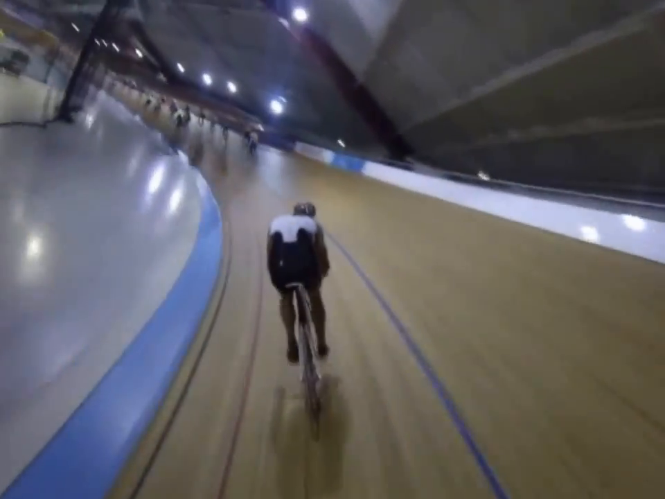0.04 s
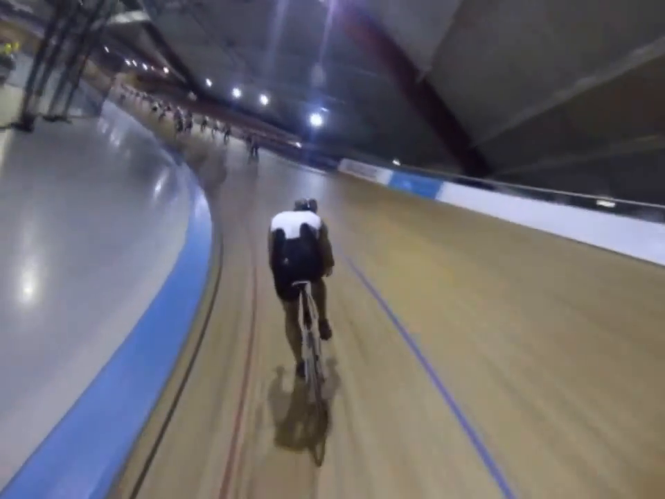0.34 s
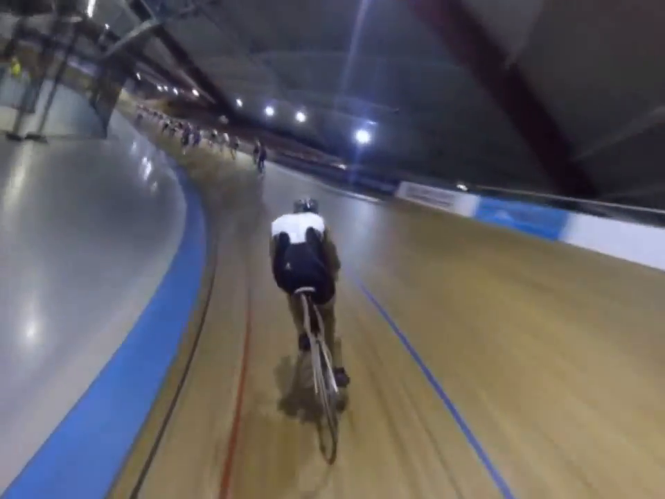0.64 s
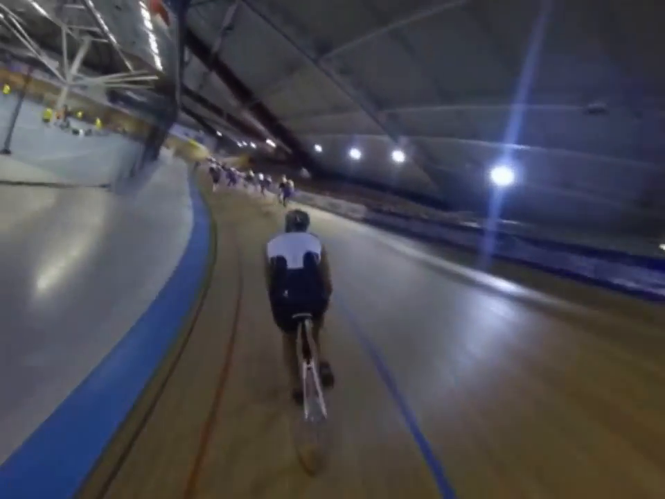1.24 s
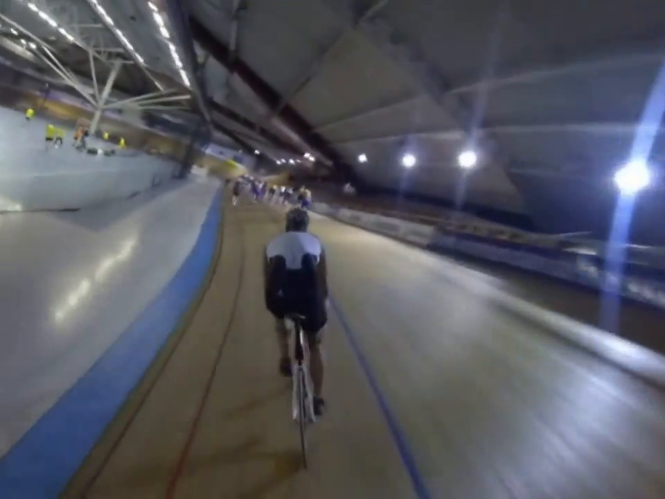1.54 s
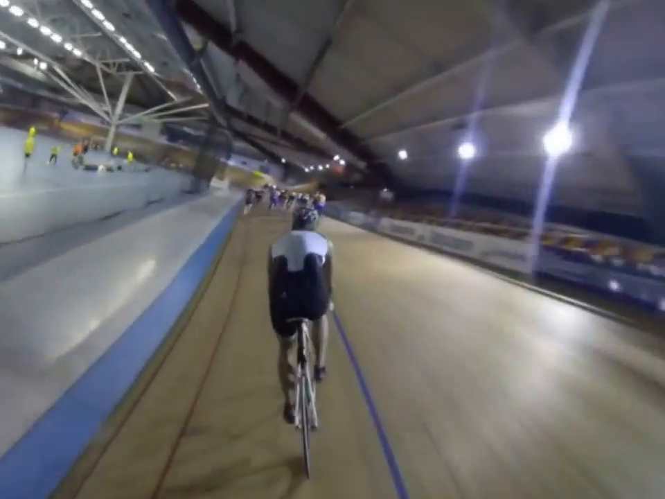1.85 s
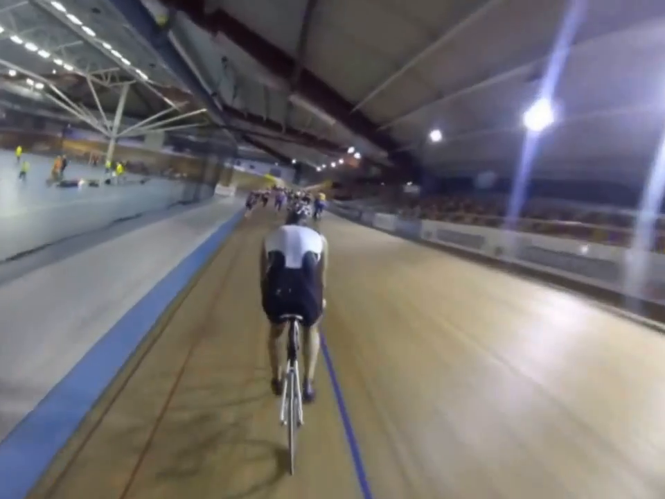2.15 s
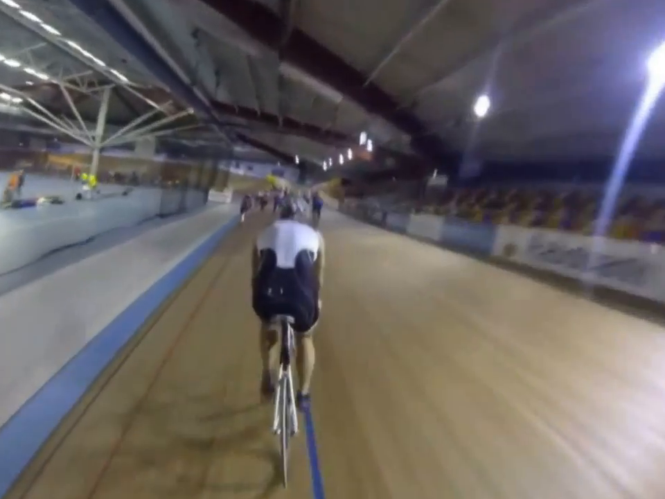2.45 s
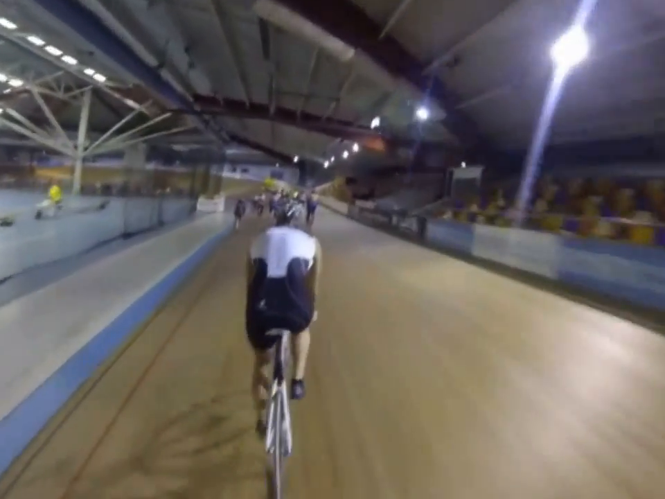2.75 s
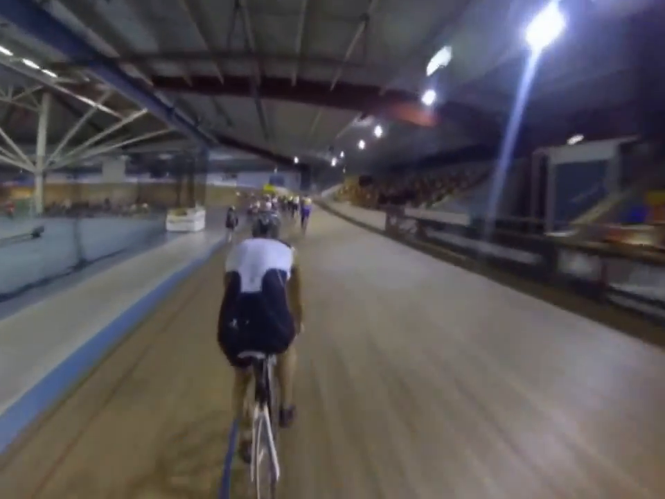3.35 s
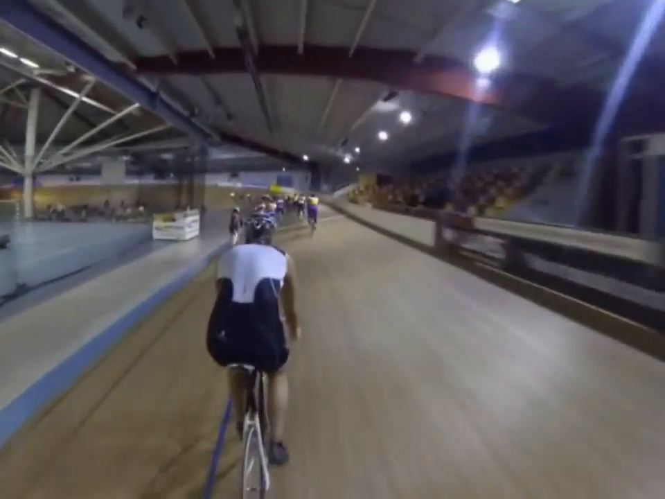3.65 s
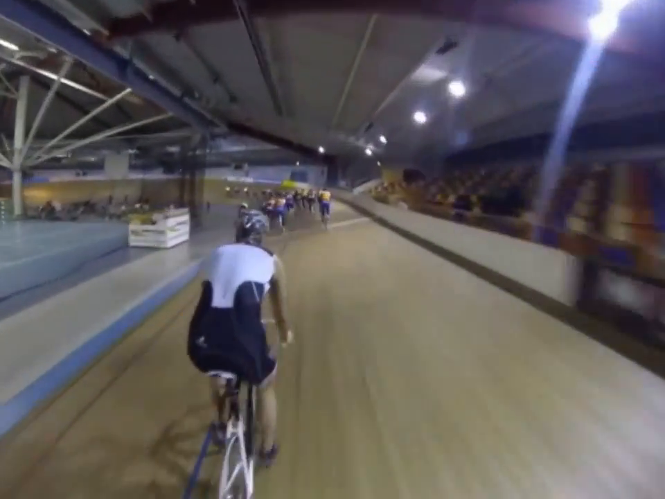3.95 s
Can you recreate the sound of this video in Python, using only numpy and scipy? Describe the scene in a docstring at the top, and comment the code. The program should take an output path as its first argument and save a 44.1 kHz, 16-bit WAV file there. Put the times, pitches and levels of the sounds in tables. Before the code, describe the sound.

Wind rumbles and rushes over a microphone riding on a bicycle, mixed with tyres roaring on an indoor wooden track. Gusts make the roar duck and swell, and the mount rattles briefly near the end.

```python
"""Riding round a velodrome

A camera rides on a track bicycle, close behind another rider, round an indoor wooden track.
Air rumbles and rushes over its housing, the tyres roar on the boards and the mount ticks and rattles.
Buffets of wind push the camera's limiter down, so the whole roar ducks and swells back."""
import sys
import numpy as np
from scipy import signal
from scipy.fft import rfft, irfft
from scipy.io import wavfile
from scipy.ndimage import uniform_filter1d

SR = 44100
rng = np.random.default_rng(int(sys.argv[2]) if len(sys.argv) > 2 else 0)


def bounce(signal):
    """Save signal as a 16-bit WAV file at the path given by the first command-line argument."""
    frames = np.transpose(np.atleast_2d(signal))
    limited = np.clip(frames, -1, 1)
    pcm = np.round(limited * 32767).astype(np.int16)
    wavfile.write(sys.argv[1], SR, pcm)


N = 176400
T = np.arange(N) / SR


def from_db(db):
    """Turn decibels into a number to multiply by."""
    return 10 ** (np.asarray(db) / 20)


def curve(rows):
    """Join (time, level) points with straight lines."""
    return np.interp(T, *np.transpose(rows))


def drift(hz):
    """A random wobble of about size 1, mostly slower than hz."""
    f = np.fft.rfftfreq(N, 1 / SR)
    slow = irfft(rfft(rng.standard_normal(N)) / (1 + (f / hz) ** 2), N)
    return slow / slow.std()


def noise(spectrum, resonances=()):
    """Noise with the spectrum's level in each 1 Hz band, boosted at the resonances."""
    f = np.fft.rfftfreq(N, 1 / SR) + 1e-3
    hz, db = np.transpose(spectrum)
    level = np.interp(np.log(f), np.log(hz), db)
    for centre, width, lift in resonances:
        level = level + lift / (1 + (2 * (f - centre) / width) ** 2)
    return irfft(rfft(rng.standard_normal(N)) * from_db(level), N) * np.sqrt(SR / 2)


def swells(rows):
    """One smooth rise and fall in volume for each row."""
    return sum(from_db(db) / (1 + ((T - s) / half) ** 4) for s, half, db in rows)


def ring(clicks, hz, t60):
    """Each click starts a tone that fades by 60 dB in t60 seconds."""
    decay = from_db(-60 / (t60 * SR))
    step = 2 * np.pi * hz / SR
    return signal.lfilter([0, np.sin(step)], [1, -2 * decay * np.cos(step), decay * decay], clicks + 1e-18)


# eddies (swirls of air) at the microphone opening: f/Hz, level/dB
RUMBLE_SPECTRUM = [(5, -38), (12, -40.5), (22, -35), (33, -29.5), (46, -35), (62, -36.5), (100, -42),
                   (200, -47.5), (400, -63), (1000, -93), (4000, -130)]
# how strong the eddies are: t/s, level/dB
EDDY_STRENGTH = [(0, 0.5), (.25, -0.5), (.42, -1), (.95, -0.5), (1.15, 0.5), (1.65, 0), (1.85, 0),
                 (2.3, 0.5), (2.8, 0), (3.3, -0.5), (3.65, 0), (3.76, -3), (4, -0.5)]
# sudden shoves of wind: t/s, level/dB
WIND_BUFFETS = [(0.33, 1.5), (0.461, -4.5), (0.559, -4), (0.612, -4), (0.806, 0), (0.922, -1.5),
                (1.071, -2), (1.194, -2.5), (1.393, -2.5), (1.549, -3.5), (1.679, -1.5), (1.728, -5.5),
                (1.851, -2), (2.013, -1), (2.111, -2), (2.213, -2.5), (2.375, -2), (2.582, -2.5),
                (2.620, -2), (2.790, -5), (2.903, -4), (3.014, -4), (3.311, -1.5), (3.564, -1.5),
                (3.675, 0.5), (3.703, 1.5), (3.849, 1)]
def rumble(even_over_s=0.0604, evenness=0.53, push_s=0.0042, sweep_s=0.0024):
    """Eddies beat evenly on the microphone; each buffet sweeps them aside with one push or suck of air."""
    eddies = noise(RUMBLE_SPECTRUM)
    power = uniform_filter1d(eddies ** 2, int(even_over_s * SR))
    eddies *= (power.mean() / power) ** (evenness / 2)   # partly level out loud and quiet spots
    eddies *= from_db(curve(EDDY_STRENGTH))
    pushes = np.zeros(N)
    for (s, db), sign in zip(WIND_BUFFETS, rng.choice([-1, 1], len(WIND_BUFFETS))):
        pushes += sign * from_db(db) / (1 + (2 * (T - s) / push_s) ** 2)
        eddies *= 1 - 1 / (1 + ((T - s) / sweep_s) ** 2)
    return eddies + pushes


# how hard the air blows: t/s, level/dB
AIR_STRENGTH = [(0, 0.5), (.2, -2), (.32, -0.5), (.42, 0.5), (.52, 1), (.69, -3.5), (.79, 2), (.95, -0.5),
                (1.03, 1.5), (1.25, -1), (1.55, 0), (1.72, -1.5), (1.95, -0.5), (2.15, -1.5), (2.35, 0.5),
                (2.57, 1), (2.7, -2.1), (3.1, -1.5), (3.28, -1.7), (3.42, -3), (3.6, -1.5), (3.72, -6),
                (3.84, -5.5), (3.92, 1.5), (4, 0.5)]
def airflow():
    """The strength of the passing air in dB, shaken by turbulence."""
    return curve(AIR_STRENGTH) + 0.5 * drift(hz=31)


# tyres rolling on wood: f/Hz, level/dB
TYRE_SPECTRUM = [(60, -68), (210, -50), (400, -51.5), (470, -54), (650, -55.5), (900, -59), (1120, -64),
                 (1320, -78.5), (2000, -79), (5000, -130)]
def tyres(flow_db, follow=0.85, grain_db=0.7):
    """Tyres roar on the boards, roughened by the joints; the level follows the airflow."""
    return noise(TYRE_SPECTRUM) * from_db(follow * flow_db + grain_db * drift(hz=90))


# air rushing past the housing: f/Hz, level/dB
RUSH_SPECTRUM = [(200, -85), (1200, -71), (2100, -71), (2650, -75.5), (3450, -78), (4200, -89), (5500, -94),
                 (6300, -97), (7100, -110), (10000, -125)]
# pitches the housing boosts: f/Hz, width/Hz, boost/dB
HOUSING_RESONANCES = [(1760, 496, 7.5), (5050, 660, 8), (8620, 850, 8)]
# fine hiss at the microphone opening: f/Hz, level/dB
HISS_SPECTRUM = [(3000, -115), (6000, -104), (7300, -104), (9400, -103.5), (10500, -102.5), (12500, -112),
                 (15000, -123)]
# how strong that hiss is: t/s, level/dB
HISS_STRENGTH = [(0, 0), (1.5, -0.5), (2.3, -1), (2.6, -2.5), (3.3, -1), (4, 0)]
def rush(flow_db, hiss_follow=0.72, flutter_db=0.42):
    """Rushing air and fine hiss flutter together, both coloured by the housing."""
    air = noise(RUSH_SPECTRUM, HOUSING_RESONANCES) * from_db(flow_db)
    hiss_db = curve(HISS_STRENGTH) + hiss_follow * flow_db
    hiss = noise(HISS_SPECTRUM, HOUSING_RESONANCES) * from_db(hiss_db)
    return (air + hiss) * from_db(flutter_db * drift(hz=120))


# the track's drone: f/Hz, level/dB
DRONE_SPECTRUM = [(150, -75), (400, -65), (560, -69.5), (1080, -69), (1300, -80.5), (2500, -105),
                  (7000, -160)]
# the pitch the boards boost: f/Hz, width/Hz, boost/dB
BOARD_RESONANCE = [(430, 60, 5)]
def track_drone():
    """The wooden track drones steadily, heard when the wind drops."""
    return noise(DRONE_SPECTRUM, BOARD_RESONANCE)


# surges of low roar: t/s, half length/s, level/dB
SURGE_TIMES = [(.26, 0.13, -10.5), (.78, 0.01, -2.5), (1.175, 0.032, -4), (1.29, 0.047, -5),
               (1.39, 0.033, 0.5), (1.59, 0.062, 2), (1.81, 0.036, -3), (2.36, 0.012, -4),
               (2.59, 0.062, -0.5), (3.28, 0.038, -4.5)]
# their tone: f/Hz, level/dB
SURGE_SPECTRUM = [(30, -69), (90, -45), (140, -43.5), (240, -46), (450, -55), (950, -63.5), (1400, -80),
                  (3000, -110)]
def surges():
    """A low roar swells as eddies roll over the camera."""
    return swells(SURGE_TIMES) * noise(SURGE_SPECTRUM)


# flares of hiss, and brief hisses that go with the mount's ticks at 2.011 and 2.372 s: t/s, half length/s,
# level/dB
FLARE_TIMES = [(0.329, .004, 0), (.803, .005, -8), (2.011, .003, -3), (2.372, .003, 0), (3.403, 0.026, -6),
               (3.47, 0.016, -5), (3.66, 0.02, -4)]
# their tone: f/Hz, level/dB
FLARE_SPECTRUM = [(1500, -100), (3500, -81), (5500, -84.5), (7000, -93.5), (11000, -107), (15000, -114)]
def flares():
    """Air tears off the housing in short, bright hisses; at 2.01 and 2.37 s a brief hiss goes with a tick of
    the mount."""
    return swells(FLARE_TIMES) * noise(FLARE_SPECTRUM)


# quick gusts: t/s, half length/s, level/dB
GUST_TIMES = [(.79, 0.017, -1), (1.005, 0.024, -4), (1.172, 0.017, -0.5), (1.375, 0.019, 0),
              (1.54, 0.018, 2), (1.63, 0.051, -10), (1.82, 0.014, -9), (3.285, 0.016, -4)]
# their tone: f/Hz, level/dB
GUST_SPECTRUM = [(200, -85), (520, -60), (950, -58), (1300, -73.5), (2000, -74), (3400, -82), (4400, -93.5),
                 (7000, -106), (11000, -107), (15000, -124)]
def gusts():
    """Gusts flap past the housing, full in the middle pitches with a puff of hiss on top."""
    return swells(GUST_TIMES) * noise(GUST_SPECTRUM, HOUSING_RESONANCES)


# knocks on the camera mount: t/s, level/dB, favoured f/Hz
MOUNT_KNOCKS = [(2.011, -34, 7000), (2.372, -26, 8500), (3.4433, -17.5, 3900), (3.4455, -31, 5000),
                (3.4578, -21, 6200), (3.4647, -22.5, 1800), (3.4735, -33, 6500), (3.486, -30, 9000),
                (3.4992, -22.5, 2680)]
# tones the mount rings with: f/Hz, level/dB, time to fade 60 dB/s
MOUNT_TONES = [(1760, -3, 0.038), (2980, -8.5, 0.017), (3550, -6, 0.0067), (3980, -6.5, 0.0041),
               (5090, -14, 0.017), (5950, -20, .01), (8600, -18, .01)]
def mount(off_pitch_db=9, off_pitch_octaves=0.63, contact_hz=7000):
    """Each knock rings the plastic mount, favouring the tones near its own pitch."""
    s, db, favoured_hz = np.transpose(MOUNT_KNOCKS)
    ringing = np.zeros(N)
    for k, (hz, level_db, t60) in enumerate(MOUNT_TONES):
        loss_db = off_pitch_db * (np.log2(hz / favoured_hz) / off_pitch_octaves) ** 2
        clicks = np.zeros(N)
        clicks[(s * SR).astype(int)] = from_db(db + level_db - loss_db)
        ringing += (-1) ** k * ring(clicks, hz, t60)
    soft_contact = signal.butter(2, contact_hz, fs=SR, output="sos")   # dulls the highest tones
    return signal.sosfilt(soft_contact, ringing)


def scene():
    """Wind, tyres, track and mount add up at one microphone."""
    flow_db = airflow()
    roar = tyres(flow_db, grain_db=0.7) + rush(flow_db)
    bursts = flares() + surges() + gusts()
    return (roar + bursts + rumble() + track_drone() + mount())[None]


def record(dry, limit_db=-5, attack_s=0.00035, release_db_per_s=49.5):
    """A limiter turns loud peaks down fast and recovers slowly; the deepest bass and the top are cut."""
    over_db = np.maximum(20 * np.log10(np.abs(dry) + 1e-9) - limit_db, 0)
    recovery_db = release_db_per_s * T
    held_db = np.maximum.accumulate(over_db + recovery_db, axis=-1) - recovery_db
    smoothing = np.exp(-1 / (attack_s * SR))
    duck_db = signal.lfilter([1 - smoothing], [1, -smoothing], held_db)
    limited = dry * from_db(-duck_db)
    bass_cut = signal.butter(1, 22, "high", fs=SR, output="sos")
    top_cut = signal.cheby2(12, 70, 16000, fs=SR, output="sos")
    return signal.sosfilt(top_cut, signal.sosfilt(bass_cut, limited))


dry = scene()
out = record(dry)
bounce(out)
```